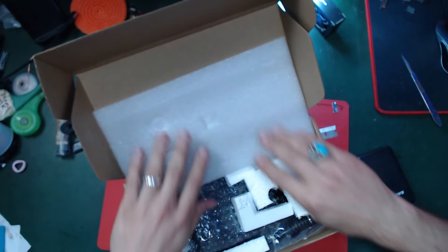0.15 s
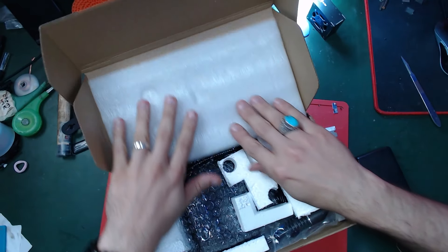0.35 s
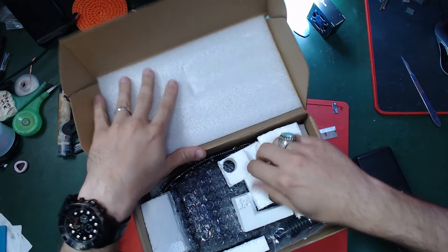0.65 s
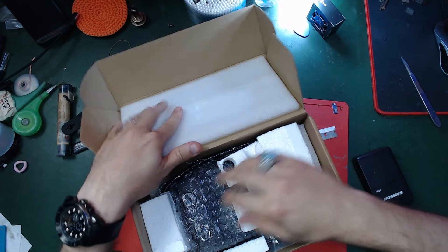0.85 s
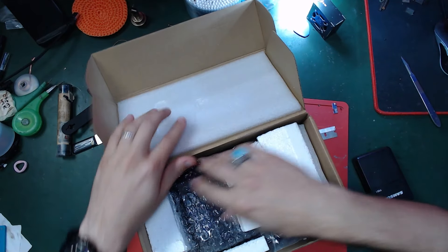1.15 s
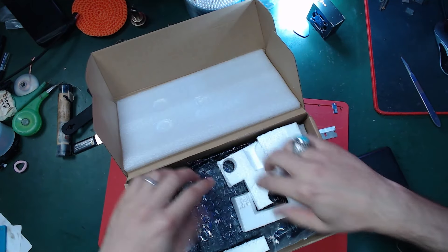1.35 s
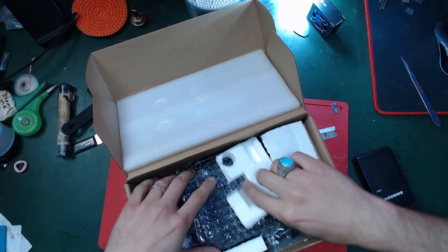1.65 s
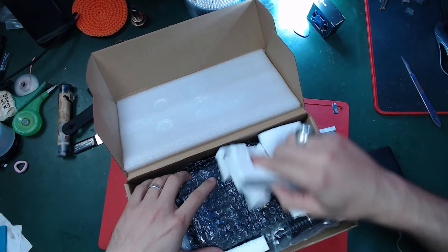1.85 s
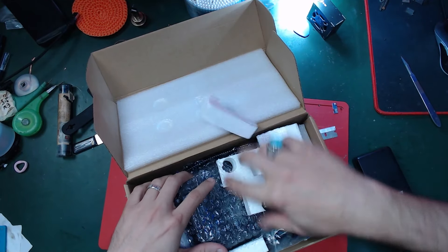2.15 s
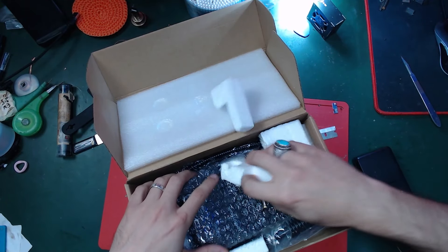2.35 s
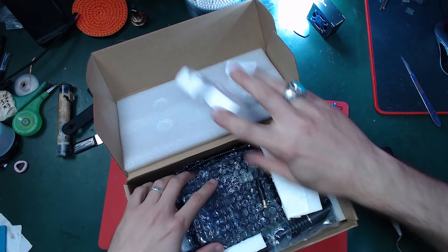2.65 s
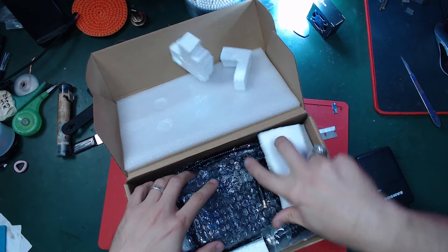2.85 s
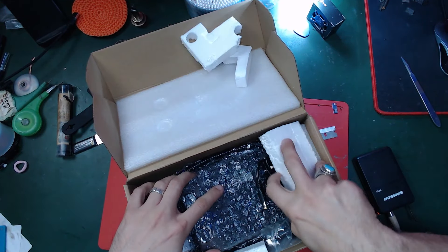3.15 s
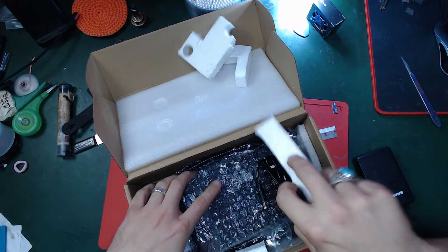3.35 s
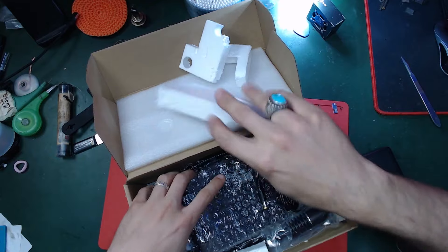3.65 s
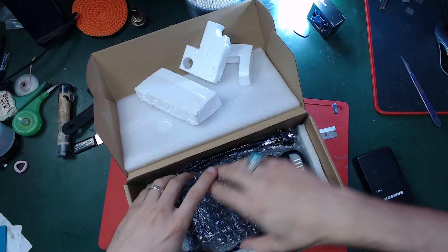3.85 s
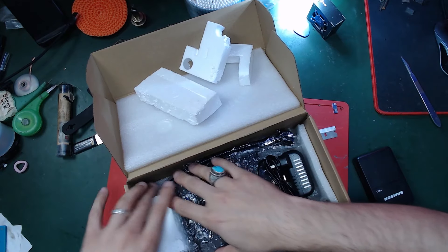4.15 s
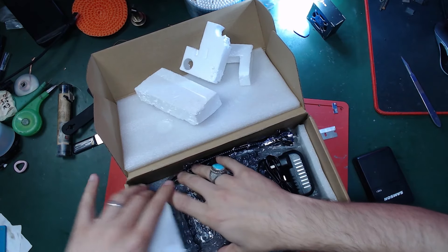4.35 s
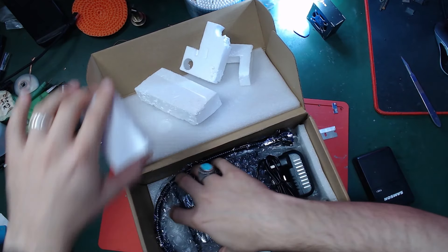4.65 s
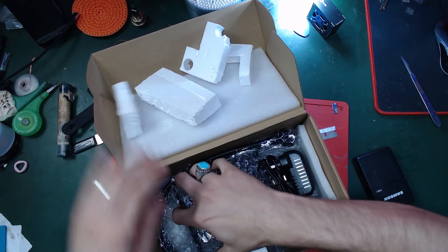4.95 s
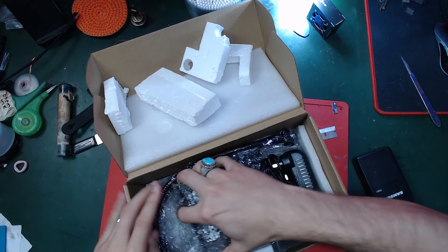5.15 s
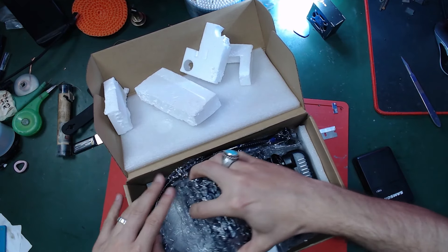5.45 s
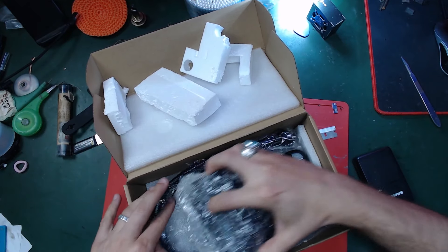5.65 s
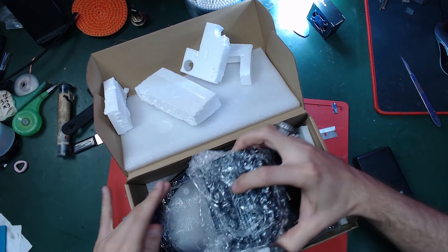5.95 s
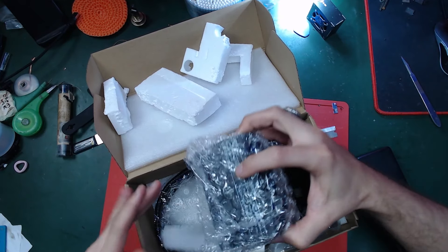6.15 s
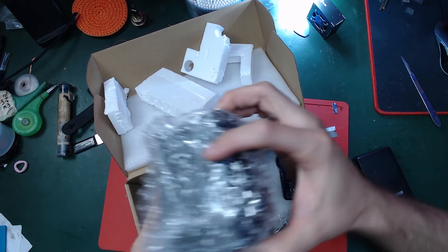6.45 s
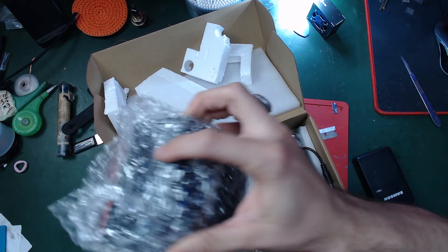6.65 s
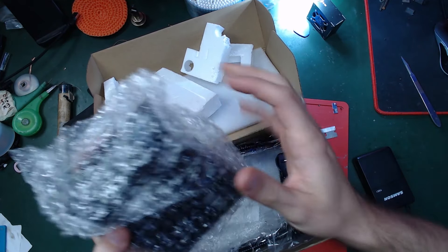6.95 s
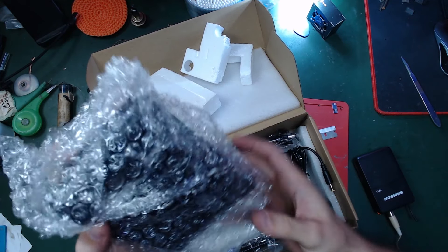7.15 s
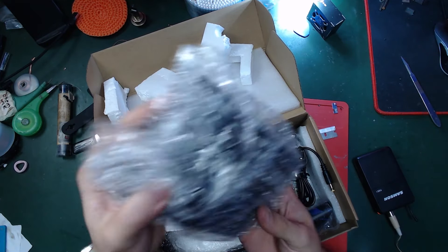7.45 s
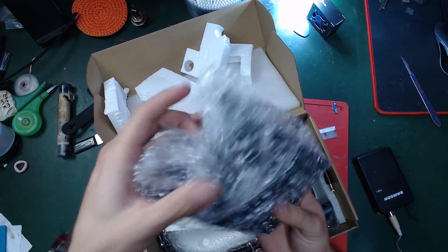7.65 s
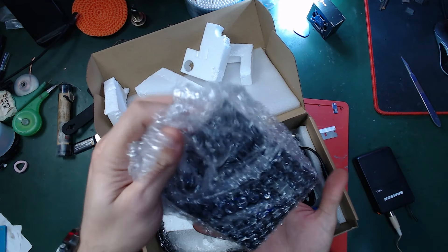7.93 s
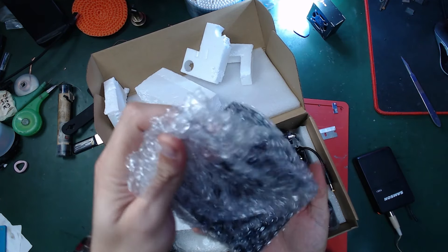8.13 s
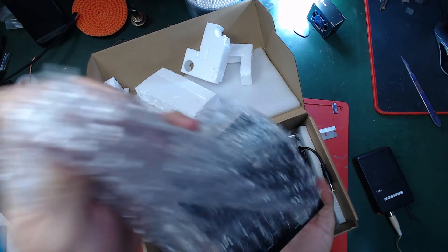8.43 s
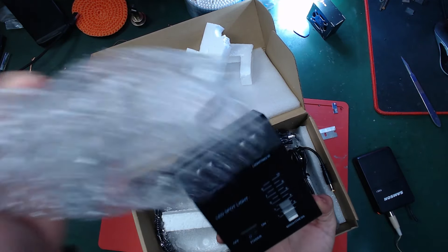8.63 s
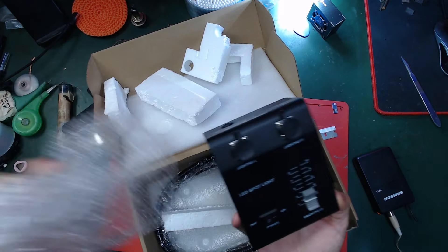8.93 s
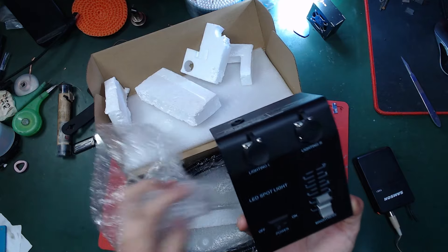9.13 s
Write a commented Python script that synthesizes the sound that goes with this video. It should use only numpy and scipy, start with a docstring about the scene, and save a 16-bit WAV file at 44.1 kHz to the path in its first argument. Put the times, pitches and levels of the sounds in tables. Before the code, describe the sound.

Close to one microphone in a quiet, dry room, hands unpack a cardboard box. First the lid rubs and thuds open. Packing foam then hisses, ticks and squeaks briefly against the cardboard as piece after piece comes out, with faint bumps. A burst of sharp bubble wrap crinkling follows, with scraping and a hollow knock from the box, easing into a lighter plastic rustle near the end.

```python
"""Hands rub and knock on a cardboard lid as they fold it back, then pull foam blocks out of the box and
unwrap bubble film, close to one microphone in a small, dry room. Sliding friction hisses, and foam
squeaks on cardboard by stick-slip. Creases in film and foam buckle in tiny grains and louder snaps.
Blows excite the modes of the walls and of the hollow; pushing the box makes it scrape and rumble."""
import sys
import numpy as np
from scipy import signal
from scipy.fft import rfft, irfft, next_fast_len
from scipy.io import wavfile
from scipy.ndimage import uniform_filter1d

SR = 44100
rng = np.random.default_rng(int(sys.argv[2]) if len(sys.argv) > 2 else 0)


def to_wav(s):
    """Save 16-bit WAV."""
    ch = np.atleast_2d(s).T  # columns
    pcm = np.round(np.clip(ch, -1, 1) * 32767)  # PCM
    wavfile.write(sys.argv[1], SR, pcm.astype(np.int16))


N = 409688


def gain_of(db):
    """Amplitude ratio of a level in decibels."""
    return 10 ** (np.asarray(db) / 20)


def unit_rms(x):
    """Normalisation to a mean square of one."""
    return x / np.sqrt(np.mean(x ** 2) + 1e-20)


def add(mix, start_s, sound):
    """Superposition: a sound adds to the mix from its onset."""
    part = mix[round(start_s * SR):][:len(sound)]
    part += sound[:len(part)]


def follow(rows):
    """Linear interpolation of each column of a time table."""
    times, *columns = np.transpose(rows)
    return [np.interp(np.arange(N) / SR, times, column) for column in columns]


def colour(x, spectrum):
    """Spectral shaping by (f/Hz, level/dB) points, at unit RMS."""
    size = next_fast_len(len(x))
    hz, db = np.transpose(spectrum)
    log_f = np.log(np.fft.rfftfreq(size, 1 / SR) + 1)
    curve_db = np.interp(log_f, np.log(hz), db, left=-90, right=-90)
    return unit_rms(irfft(rfft(x, size) * gain_of(curve_db), size)[:len(x)])


def bandpass(x, hz, ratio):
    """Band-pass filtering from hz / ratio to hz * ratio."""
    edges = np.clip([hz / ratio, hz * ratio], 300, SR * .45)
    return signal.sosfilt(signal.butter(2, edges, "band", fs=SR, output="sos"), x)


def hush():
    """Background noise: a faint, steady random signal, strongest in the bass."""
    # noise spectrum: f/Hz, relative level/dB
    spectrum = [(24, -55), (40, -16.5), (82, -26), (122, -1), (147, -0.5), (550, -14.5), (819, -20.5),
                (6000, -46), (7800, -69), (13200, -120)]
    return gain_of(-77) * colour(rng.standard_normal(N), spectrum)


def friction(depth_db, span):
    """Sliding friction: uneven contact, smoothed over span samples, modulates noise."""
    noise, contact = rng.standard_normal((2, N))
    return noise * gain_of(depth_db * unit_rms(uniform_filter1d(contact, span)))


def shifting_folds(x, depth_db):
    """Spectral modulation: the colour drifts in patches as other folds take the strain."""
    spectra = signal.stft(x, nperseg=256)[2]
    patches = uniform_filter1d(rng.standard_normal(spectra.shape), 2, axis=0)
    patches = uniform_filter1d(patches, 16, axis=1)
    spectra *= gain_of(depth_db * unit_rms(patches))
    return unit_rms(signal.istft(spectra, nperseg=256)[1][:len(x)])


def burst(hz, ratio, t60):
    """A damped transient: exponentially decaying noise in a band around hz, peak 1."""
    t = np.arange(SR // 16) / SR
    out = bandpass(rng.standard_normal(len(t)) * gain_of(-60 * t / t60), hz, ratio)
    return out / abs(out).max()


def creases(base_rate, spread_db, lo_hz, hi_hz, t60, bands):
    """Buckling as a clustered random process: many creases flip faintly, a few strongly."""
    activity = uniform_filter1d(rng.standard_normal(N // 64 + 1), 12)
    clumping = gain_of(7.2 * unit_rms(np.repeat(activity, 64)[:N]))
    out = np.zeros(N)
    for hz in np.geomspace(lo_hz, hi_hz, bands):
        strength = gain_of(spread_db * np.minimum(rng.exponential(1, N), 4.0))
        flips = rng.random(N) < clumping * base_rate / bands / SR
        out += signal.oaconvolve(strength * flips, burst(hz, 1.45, t60)[:1024])[:N]
    return unit_rms(out)


def handling():
    """Friction and buckling follow the hands' effort; being incoherent, they add in power."""
    # effort, one list per movement of lid, foam or film: t/s, crackle level/dB
    moves = [
        [(.16, -94), (.19, -57), (.36, -64), (.41, -55.5), (.5, -59.5), (.54, -44), (.61, -56)],
        [(.69, -51), (.79, -43.5), (.89, -47), (.96, -62), (1.02, -60), (1.09, -56.5), (1.19, -78), (1.24, -70),
         (1.36, -100)],
        [(1.39, -54), (1.447, -44), (1.55, -52), (1.63, -42), (1.76, -50), (1.786, -73), (1.81, -47),
         (1.84, -64.5), (1.96, -63), (2.05, -69), (2.12, -75)],
        [(2.17, -60.5), (2.25, -49.5), (2.305, -44), (2.36, -58), (2.45, -66.5), (2.6, -72)],
        [(2.78, -63), (2.814, -71), (2.9, -61.5), (3.12, -65)],
        [(3.19, -52.5), (3.31, -51), (3.36, -57), (3.457, -44), (3.5, -54.5), (3.63, -48), (3.68, -53.5),
         (3.92, -47.5), (3.97, -46.5), (4.016, -60)],
        [(4.035, -54.5), (4.09, -56.5), (4.205, -47), (4.285, -54.5), (4.425, -68.5), (4.5, -66.5)],
        [(4.73, -56), (4.87, -46), (4.98, -53.5)],
        [(5.04, -49), (5.23, -47), (5.273, -34), (5.36, -46.5), (5.43, -37), (5.49, -36.5), (5.57, -25.5),
         (5.66, -35), (5.7, -41), (5.79, -47)],
        [(6.05, -37), (6.09, -39.5), (6.2, -32.5), (6.22, -40), (6.26, -40), (6.33, -49), (6.4, -57),
         (6.535, -52.5)],
        [(6.59, -41), (6.74, -52), (6.86, -48.5), (6.97, -56), (7.017, -50), (7.11, -61.5), (7.164, -61)],
        [(7.23, -48), (7.44, -47), (7.49, -43.5), (7.55, -49), (7.7, -42.5), (7.95, -49.5), (8.057, -47),
         (8.15, -49), (8.19, -46), (8.4, -47), (8.5, -56), (8.57, -65.5), (8.685, -65), (8.93, -91.5)],
        [(8.96, -49), (8.995, -48.5), (9.14, -53), (9.25, -53), (9.29, -58)],
    ]
    # foam fizzes, film crackles: t/s, fizz re crackle/dB, share of power in grains (0-1)
    material = [(.2, 8.5, 0.17), (.36, 11.5, 0), (.5, 3, 0), (.56, -14, 0.4), (.7, -6, 0.5),
                (.96, -13, 0.6), (1.03, 0.5, 0.56), (1.2, -5.5, 0.8), (1.36, -13, .7), (1.45, 7, 0.26),
                (1.63, 3, .4), (1.95, 11.5, 0.8), (2.11, 3, 1), (2.3, 1, 0.2), (2.45, 11, 0.1),
                (2.75, 1.5, 0.46), (3.15, 8.5, 0), (3.45, -2.5, 0.94), (3.9, 2, 0.6), (3.98, -3, 0.4),
                (4.09, 6, .4), (4.5, 2, 0.86), (4.8, 6.5, 0.8), (4.9, -3, 0.74), (5.1, 3.5, 0.4),
                (5.27, 2.5, 0.5), (5.4, -5, 0.13), (5.8, -3.5, 0.58), (6.2, -4.5, 0.69), (6.4, 0, 1),
                (6.7, 2, 0.37), (7.2, 0.5, 0.42), (8.3, 0.5, 0.38), (8.5, 0.5, 0.54), (8.6, -6.5, 0.9),
                (8.92, -7, .4), (9.0, 1.5, .2)]
    # crackle spectrum: f/Hz, relative level/dB
    crackle_spectrum = [(900, -41), (1300, -16), (1600, -7.5), (1950, -8.5), (2400, -6), (2900, -2.5),
                        (3500, -6), (4200, -4), (4800, -3), (5600, -11), (6500, -9.5), (8000, -31)]
    # fizz spectrum: f/Hz, relative level/dB
    fizz_spectrum = [(5000, -12), (6300, -11.5), (8000, -2.5), (11000, -2), (14000, -1.5), (16500, -0.5)]
    effort_db, = follow(np.concatenate(moves))
    fizz_db, share = follow(material)
    grain_gain, rub_gain = np.sqrt([share, 1 - share])
    wide = creases(300, 4.0, 3000, 12000, t60=0.0059, bands=4)  # heard in both crackle and fizz
    low = creases(900, 2.7, 1500, 7000, t60=0.005, bands=8) + 0.87 * wide
    high = creases(600, 2.9, 12000, 15000, t60=0.0035, bands=6) + 1.6 * wide
    rub = shifting_folds(friction(depth_db=2.0, span=200), depth_db=2.0)
    crackle = grain_gain * colour(low, crackle_spectrum) + rub_gain * colour(rub, crackle_spectrum)
    fizz = grain_gain * colour(high, fizz_spectrum) + rub_gain * colour(rub, fizz_spectrum)
    return gain_of(effort_db) * crackle + gain_of(effort_db + fizz_db) * fizz


def pushed_box():
    """Forced vibration: friction drives the walls and the hollow of the box."""
    # strength of the pushing: t/s, scrape level/dB, rumble level/dB
    pushes = [(.16, -82.5, -84), (.21, -64, -58.5), (.36, -68, -82), (.41, -59, -48.5), (.5, -54.5, -44),
              (.54, -40.5, -45.5), (.69, -57, -60), (.79, -32.5, -32.5), (.9, -50, -53.5),
              (1.1, -53.5, -49), (1.36, -72, -62), (1.447, -46.5, -50.5), (1.55, -57, -58),
              (1.63, -49.5, -54.5), (1.9, -60.5, -60), (2.11, -67, -69), (2.28, -52, -50.5),
              (2.6, -70, -66.5), (2.81, -59.5, -57.5), (3.12, -63, -62), (3.2, -58.5, -60.5),
              (3.6, -56, -63), (3.68, -52, -53), (3.93, -55, -58), (4.2, -54.5, -61.5), (4.45, -66.5, -65),
              (4.74, -57.5, -76), (4.87, -57.5, -59.5), (5.04, -56.5, -67), (5.27, -46, -59),
              (5.36, -50, -54), (5.57, -35, -51.5), (5.79, -50, -56.5), (5.95, -44.5, -52.5),
              (6.05, -41, -50.5), (6.2, -40, -47.5), (6.4, -52.5, -52), (6.59, -55.5, -53.5),
              (6.86, -64.5, -63), (7.16, -72, -66.5), (7.45, -64.5, -69), (7.7, -56.5, -67.5),
              (7.95, -63.5, -73), (8.06, -58.5, -65), (8.4, -58, -69), (8.57, -72.5, -73),
              (8.93, -86.5, -83.5), (9.0, -60, -68), (9.14, -71, -78.5), (9.29, -62, -86)]
    # response of the walls: f/Hz, relative level/dB
    scrape_spectrum = [(330, -25), (430, -5), (580, -5), (720, -4.5), (900, -6), (1020, -9), (1300, -9.5),
                       (1650, -12.5), (2000, -44.5)]
    # response of the hollow: f/Hz, relative level/dB
    rumble_spectrum = [(25, 1), (55, -6), (90, -11), (120, -3.5), (155, -12), (200, 5), (270, -1.5),
                       (335, -0.5), (400, -3), (480, -25)]
    scrape_db, rumble_db = follow(pushes)
    scrape = colour(friction(depth_db=4.2, span=500), scrape_spectrum)
    rumble = colour(friction(depth_db=3.8, span=1100), rumble_spectrum)
    return gain_of(scrape_db) * scrape + gain_of(rumble_db) * rumble


def squeak(hz, size):
    """Irregular stick-slip: a fuzzy whistle on a wider band of hiss."""
    settle = 200  # samples for the filters to settle
    noise = shifting_folds(rng.standard_normal(size + settle), depth_db=4.7)
    whistle = unit_rms(bandpass(noise, hz, 1.1)[settle:])
    hiss = unit_rms(bandpass(noise, hz, 1.7)[settle:])
    return unit_rms(0.47 * whistle + hiss)


def foam_slips():
    """Static friction gives way: a block catches on cardboard, squeaks and lets go."""
    # slips: t/s, nominal length/s, high squeak level/dB, high squeak f/Hz, low squeak level/dB
    slips = [(.363, .028, -45.5, 7350, -57), (0.84, 0.015, -64, 7000, -39.5),
             (.987, .031, -53.5, 9500, -56), (1.681, 0.011, -32, 13200, -41), (1.7, 0.017, -49, 15200, -43),
             (1.834, .05, -45, 12900, -53.5), (1.985, 0.037, -52, 13100, -51),
             (2.037, .02, -55.5, 15100, -57), (2.071, .012, -61, 15200, -71.5),
             (2.169, 0.098, -43, 15300, -46.5), (2.3, 0.04, -33.5, 14700, -51),
             (2.398, 0.011, -34, 9400, -73.5), (2.51, 0.037, -50, 14600, -55),
             (2.676, 0.02, -53, 6950, -58.5), (2.73, 0.011, -49, 12800, -56),
             (2.819, 0.044, -37, 10700, -54), (2.934, 0.0091, -45, 10900, -61),
             (2.985, 0.042, -44, 15400, -48.5), (3.087, 0.017, -45, 13900, -57),
             (3.204, 0.05, -39, 15300, -53), (3.273, 0.013, -40, 15000, -59.5),
             (3.406, .013, -45, 13400, -50), (3.592, 0.031, -46, 10600, -55),
             (3.679, 0.018, -45, 13800, -48), (3.7, 0.012, -45, 14000, -50), (3.746, 0.022, -48, 6700, -43),
             (4.331, .04, -35.5, 15600, -55), (4.589, 0.0043, -54, 13200, -44.5),
             (4.804, 0.013, -55, 10300, -51), (4.823, 0.0093, -39.5, 10300, -52),
             (4.899, 0.0078, -37, 10300, -38), (5.047, 0.013, -47, 12400, -57)]
    low_hz = 4710
    out = np.zeros(N)
    for start, length, high_db, high_hz, low_db in slips:
        size = round(length * SR * 1.4)
        roughness = unit_rms(uniform_filter1d(rng.standard_normal(size), 60))
        grip = signal.windows.tukey(size, .45) * gain_of(3.9 * roughness)
        squeaks = gain_of(low_db) * squeak(low_hz, size) + gain_of(high_db) * squeak(high_hz, size)
        add(out, start, grip * squeaks)
    return out


def ring(modes, tilt_db_per_octave, spread_db, detune, rise_s):
    """Modal decay: each blow lands elsewhere, so the damped sines are weighted and shifted anew."""
    t = np.arange(SR // 4) / SR
    out = np.zeros(len(t))
    for hz, db, t60 in modes:
        weight, shift = rng.standard_normal(2)
        level_db = db + spread_db * weight - tilt_db_per_octave * np.log2(hz / modes[0][0])
        out += gain_of(level_db - 60 * t / t60) * np.sin(2 * np.pi * hz * (1 + detune * shift) * t)
    out *= 1 - np.exp(-t / rise_s)
    return out / abs(out).max()


def knocks():
    """Impact excitation: walls and hollow ring freely under a dull thud and a papery edge."""
    # blows on the box: t/s, level/dB, relative boom level/dB, relative edge level/dB
    blows = [(0.414, -56, 13, -8), (0.445, -60, 19, -3), (0.513, -13, -30, -42), (0.674, -34, -21, -8),
             (0.729, -18, -19, -12), (0.761, -5, -33, -9), (0.773, -1, -43, -13), (0.786, -7, -26.5, -19),
             (0.809, -25, -17, -15), (0.823, -12, -47, -18), (0.976, -27, -16, -30),
             (1.439, -33.5, -34.5, 8.5), (1.577, -35, -21, -22.5), (2.195, -41.5, 3, -10.5),
             (2.327, -39.5, -1, 8), (2.426, -41, -17.5, -16.5), (2.679, -51, 12, -1), (2.756, -27, -8, -17),
             (2.826, -51, 10.5, -10), (3.032, -41, 0, -20), (3.072, -40, -8, -16), (3.229, -37, -4, 11.5),
             (3.635, -35.5, 3, 2), (3.915, -37, -8, 3), (4.066, -47, 0.5, -24), (4.796, -36, -5.5, -6),
             (5.257, -38, -8, 12), (5.423, -31, -32, 7), (6.236, -19, -5.5, -18), (6.467, -38, -4.5, 1)]
    # modes of the cardboard walls: f/Hz, level/dB, t60/s
    wall_modes = [(547, -14.5, 0.055), (581, -5.5, 0.091), (629, -9, 0.15), (712.6, 5, 0.061),
                  (761, 2, 0.025), (787, -18, 0.14), (923, -14, 0.087), (951, -13.5, 0.18),
                  (1037, -19.5, .07), (1227, -22, 0.03), (1313, -26, 0.025), (1690, -9.5, .055),
                  (1994, -18.5, 0.039), (2490, -18.5, .035), (3400, -22, 0.022), (4550, -15.5, 0.054)]
    # modes of the hollow box on the desk: f/Hz, level/dB, t60/s
    hollow_modes = [(121.4, -7, 0.18), (158, -5, 0.12), (194, 1.5, 0.06), (332, -2.5, 0.088),
                    (454, -6, 0.099)]
    lid_open_s, damping_db_per_s = 1.2, 499.5  # once the lid lies open, a hand damps the walls
    t = np.arange(SR // 4) / SR
    out = np.zeros(N)
    for start, db, boom_db, edge_db in blows:
        held = gain_of(-damping_db_per_s * (start > lid_open_s) * t)
        tilt = -.2 * db  # weak blows are duller
        walls = held * ring(wall_modes, tilt, spread_db=3.9, detune=0.006, rise_s=0.0014)
        boom = gain_of(boom_db) * ring(hollow_modes, 0, spread_db=3.5, detune=0.04, rise_s=0.0025)
        thud = gain_of(-10) * held[:SR // 16] * burst(890, 2.1, t60=0.1)
        edge = gain_of(edge_db) * burst(2500, 2.2, t60=0.09)
        add(out, start, gain_of(db) * (walls + boom))
        add(out, start, gain_of(db) * (thud + edge))
    return out


def snaps():
    """Snap-through of film and foam: a narrow-band ping, a broadband tick and a faint after-rustle."""
    # single snaps: t/s, level/dB, centre f/Hz
    events = [(0.5109, -14, 3000), (0.7292, -20, 2380), (0.8465, -28, 5060), (1.0175, -26, 13800),
              (1.3914, -29, 3600), (1.4445, -15, 11800), (1.5899, -14, 11700), (1.6262, -16.5, 4370),
              (1.7254, -23, 4580), (1.764, -27, 2890), (1.774, -22, 15100), (1.8016, -20, 10700),
              (1.8079, -24.5, 3180), (1.844, -21, 14200), (1.8862, -27, 4960), (1.949, -29, 14000),
              (1.9658, -26.5, 9950), (2.0073, -34, 4560), (2.15, -31, 14900), (2.2024, -24, 11800),
              (2.2116, -23, 4400), (2.3491, -21, 7750), (2.378, -30, 5990), (2.4045, -28, 9300),
              (2.454, -27.5, 9430), (2.7366, -32, 13200), (2.7544, -25, 3390), (2.8324, -20, 10400),
              (3.2167, -16.5, 14800), (3.2324, -14.5, 14600), (3.24, -10, 15300), (3.267, -17, 15100),
              (3.312, -19, 4930), (3.3712, -25.5, 14100), (3.4104, -18, 3350), (3.455, -33, 4750),
              (3.472, -31, 2720), (3.5135, -29, 4840), (3.554, -22, 2880), (3.581, -23, 12300),
              (3.596, -22.5, 4960), (3.6803, -20, 13700), (3.6965, -19, 2350), (3.7064, -22, 13500),
              (3.748, -19, 4950), (3.9245, -25.5, 3010), (4.0307, -23, 9370), (4.1646, -23, 4120),
              (4.2053, -19, 14400), (4.245, -19, 13600), (4.2767, -23, 14200), (4.2898, -23, 10100),
              (4.4464, -28, 2700), (4.591, -22, 12900), (4.642, -30.5, 3630), (4.6748, -21, 3750),
              (4.7257, -30, 12800), (4.7711, -24.5, 3450), (4.793, -27, 13500), (4.8116, -14, 2620),
              (4.8364, -23, 3820), (4.8755, -27, 4030), (4.9008, -27, 10200), (4.9232, -23.5, 3330),
              (5.219, -14.5, 7670), (5.2254, -14.5, 5130), (5.2465, -18, 3850), (5.264, -10, 3870),
              (5.2893, -8, 2800), (5.322, -15, 5870), (5.3706, -21.5, 6690), (5.3867, -8.5, 4320),
              (5.3978, -9.5, 4380), (5.4107, -16.5, 4340), (5.4221, -16, 3940), (5.4326, -10.5, 3710),
              (5.446, -10.5, 3860), (5.551, -5.5, 3800), (5.604, -9.5, 3290), (5.6234, -18, 3680),
              (5.8465, -20.5, 3100), (5.9388, -23, 3010), (5.9808, -22, 14000), (6.039, -20, 2690),
              (6.2347, -8, 3740), (6.2522, -18, 4650), (6.2618, -20, 3010), (6.3032, -24, 3830),
              (6.3687, -24, 4740), (6.4104, -27.5, 13600), (6.4273, -27, 10800), (6.4658, -28.5, 2790),
              (6.6936, -25, 11000), (7.002, -41, 2630), (8.6239, -43, 2300), (8.761, -44.5, 5400)]
    out = np.zeros(N)
    for start, db, hz in events:
        ping = 0.48 * burst(hz, 1.22, t60=0.011)
        tick = 0.5 * burst(6100, 2.4, t60=0.0052)
        rustle = 0.1 * burst(hz, 1.5, t60=0.068)
        add(out, start, gain_of(db) * (ping + tick + rustle))
    return out


def room(x):
    """Reverberation: reflections from desk and room walls form a short, dull tail."""
    t60, delay_s = 0.13, 0.004
    t = np.arange(SR // 3) / SR
    dull_noise = signal.lfilter([1], [1, -.6], rng.standard_normal(len(t)))
    tail = dull_noise * gain_of(-60 * t / t60) * (t > delay_s)
    return signal.oaconvolve(x, tail / np.linalg.norm(tail))[:N]


def scene():
    """Superposition at one microphone, the same in both channels."""
    near = handling() + pushed_box() + snaps() + foam_slips()
    mono = near + gain_of(-15.5) * room(near) + knocks() + hush()
    return np.array([mono, mono])


def record(dry):
    """Band limiting: the microphone loses the deep bass, and a steep low-pass cuts the top treble."""
    low_hz, high_hz = 110, 15760
    thin = signal.sosfilt(signal.butter(3, low_hz, "high", fs=SR, output="sos"), dry)
    lowpass = signal.firwin(1201, high_hz, window=("kaiser", 7), fs=SR)
    return signal.oaconvolve(thin, lowpass[None], "same")


dry = scene()
out = record(dry)
to_wav(out)
```